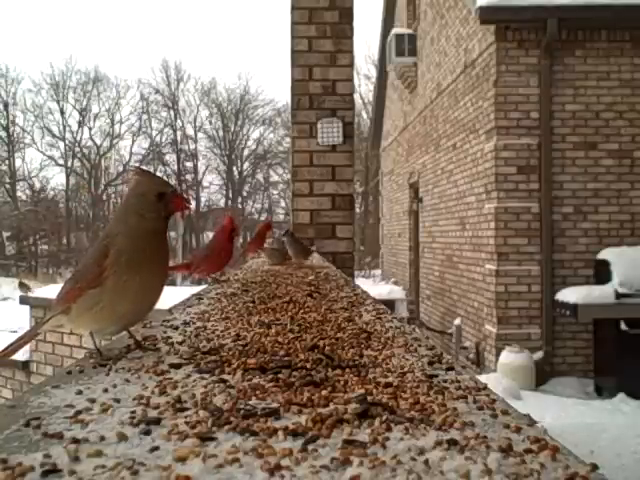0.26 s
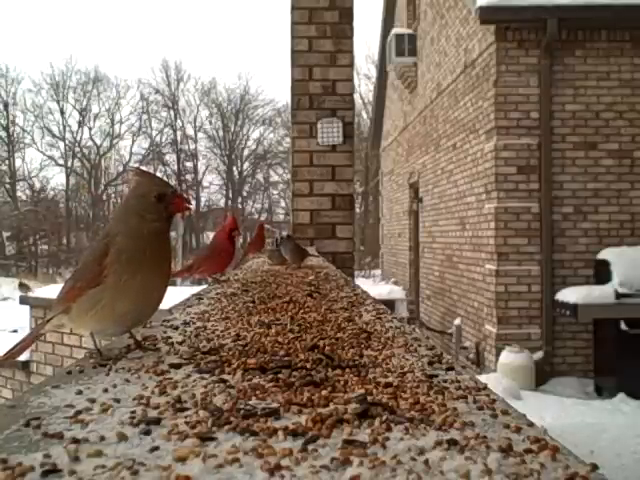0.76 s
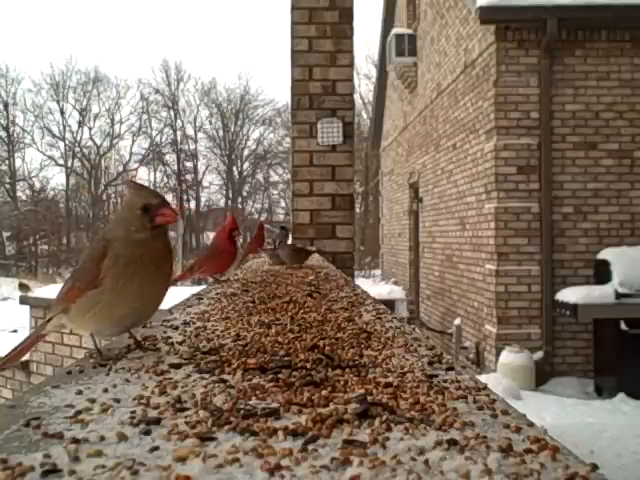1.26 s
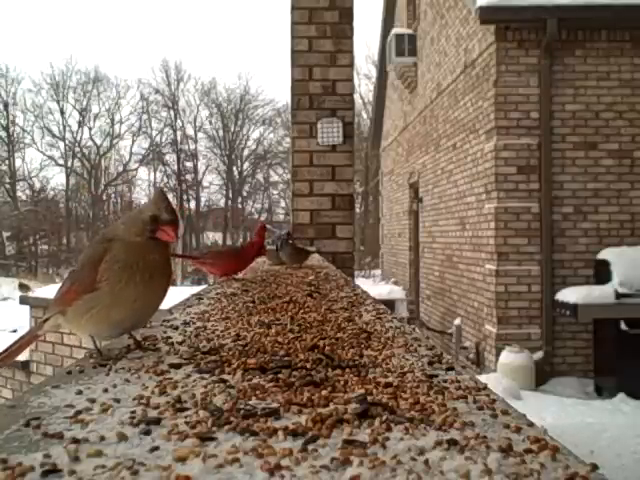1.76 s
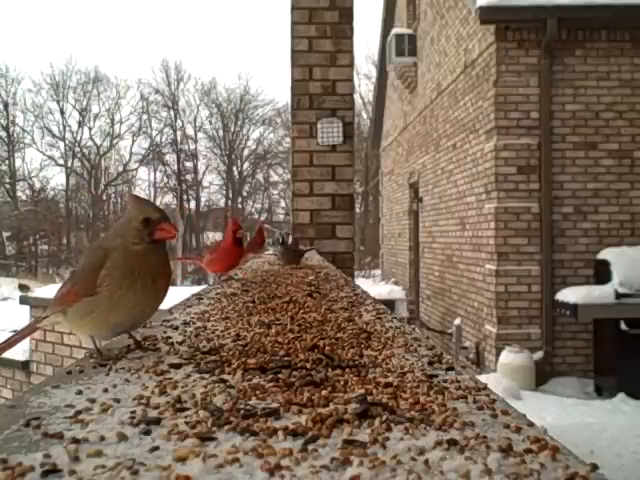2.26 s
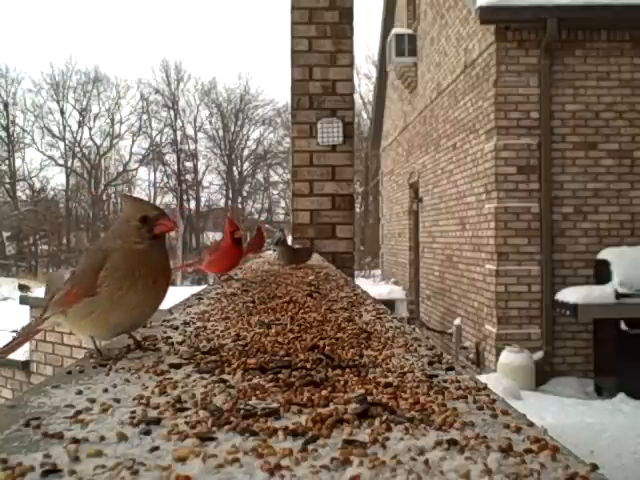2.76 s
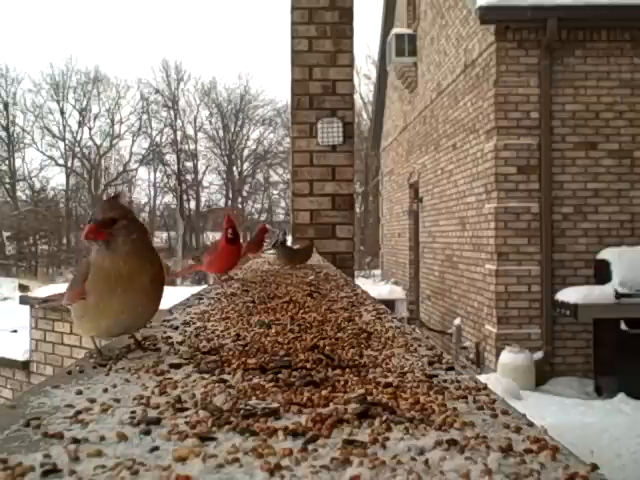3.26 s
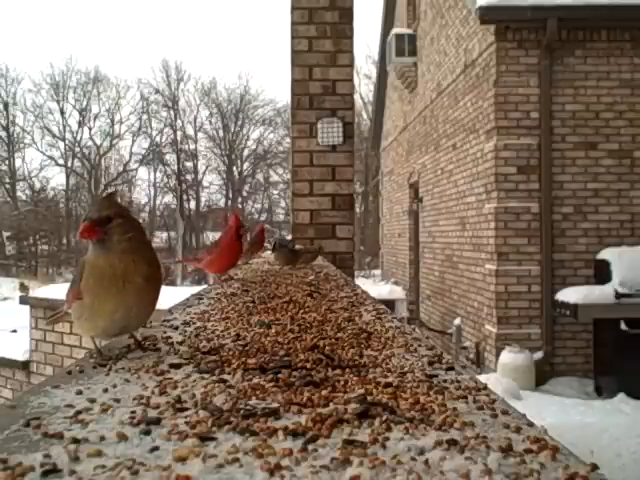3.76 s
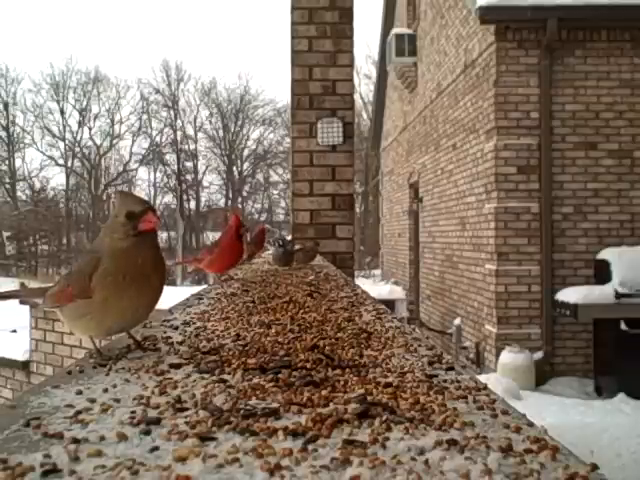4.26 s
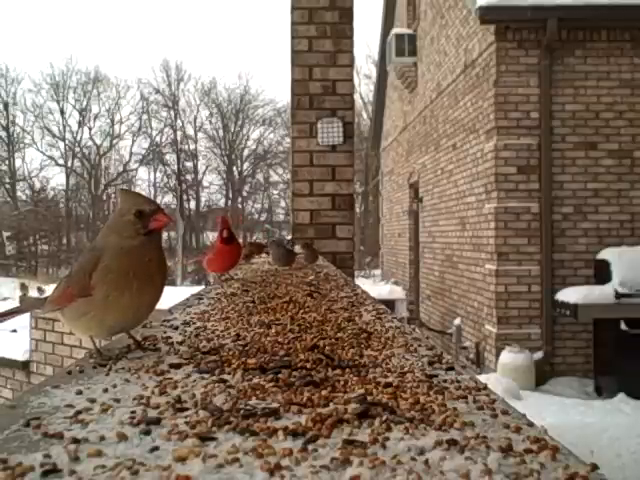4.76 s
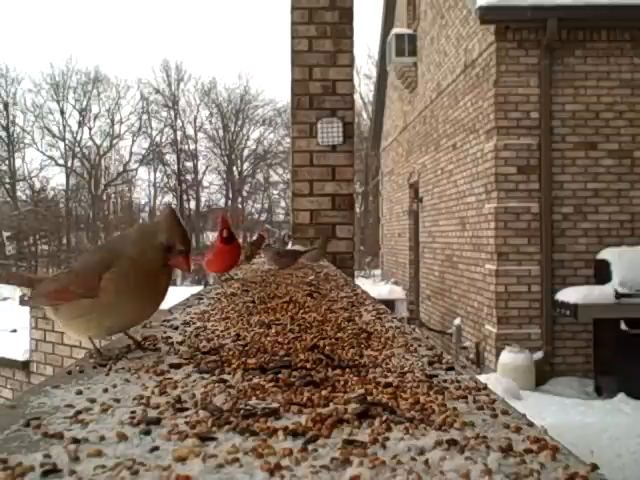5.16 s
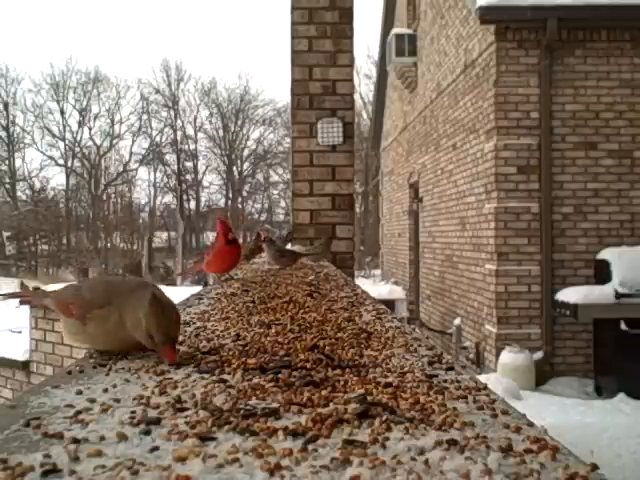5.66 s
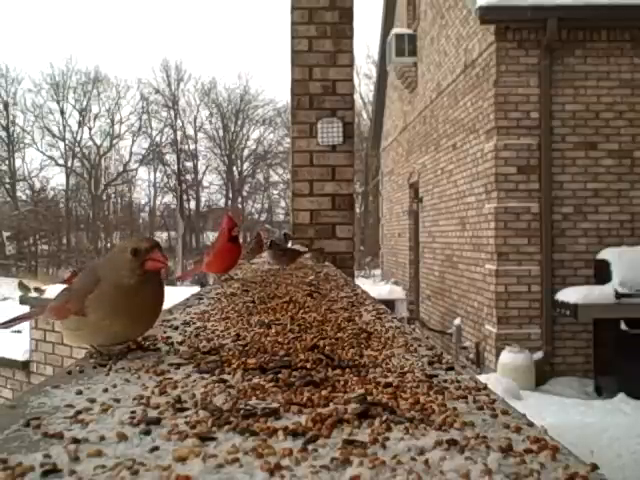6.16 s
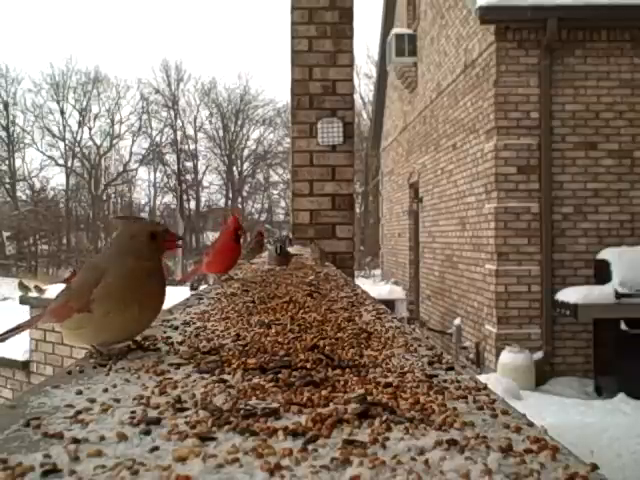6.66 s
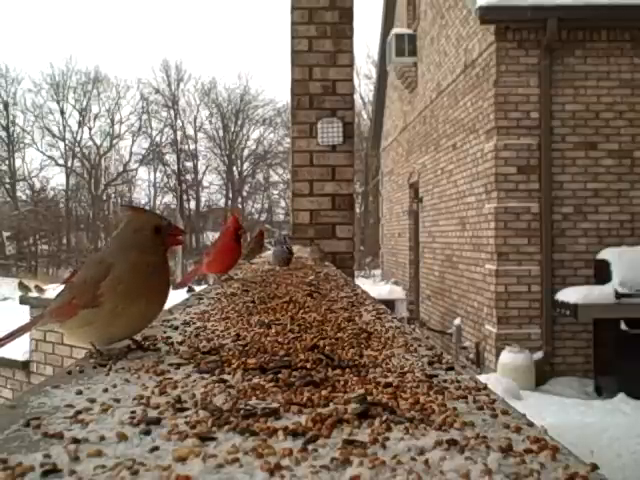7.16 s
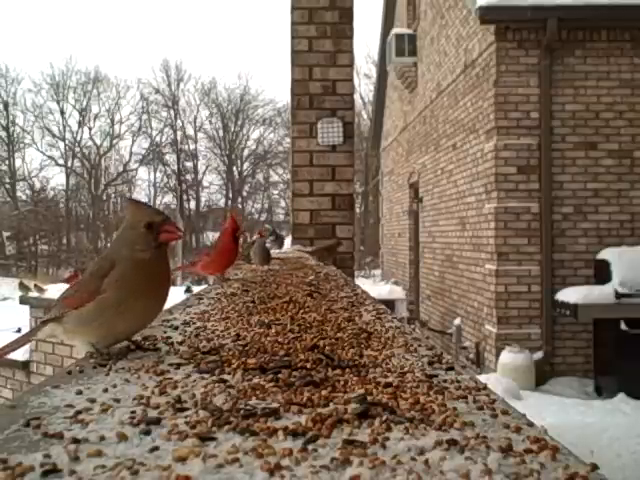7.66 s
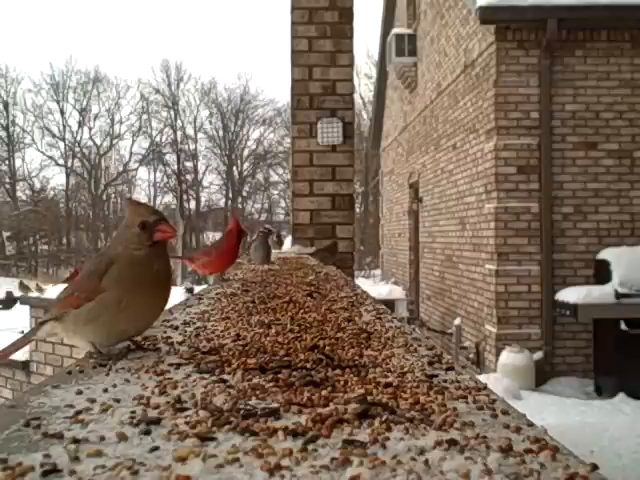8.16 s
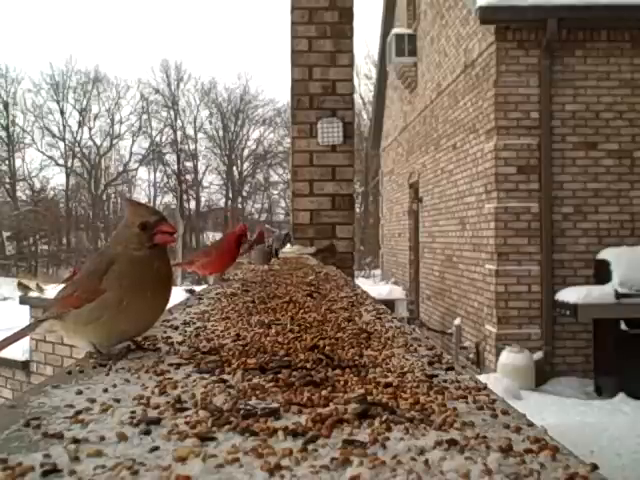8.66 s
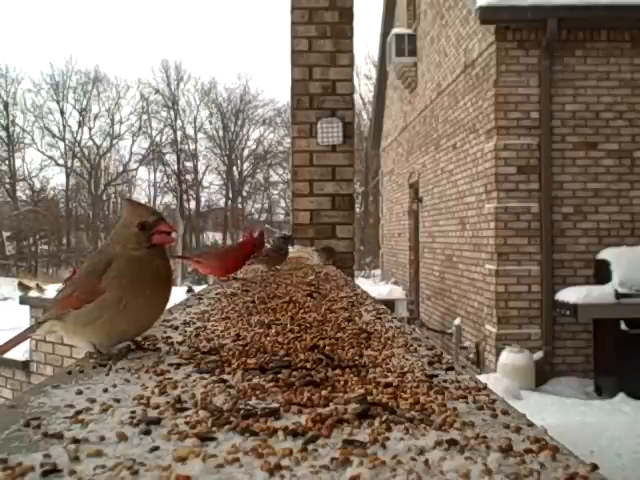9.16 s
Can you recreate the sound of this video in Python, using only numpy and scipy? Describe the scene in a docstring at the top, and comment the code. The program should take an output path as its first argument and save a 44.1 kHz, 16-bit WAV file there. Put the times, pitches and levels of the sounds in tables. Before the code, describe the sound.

An outdoor winter ledge beside a brick wall, heard close up in mono. Soft wind rumbles against the microphone, then thin distant whistles and chirps mix with sparse seed ticks. A bill knocks after six seconds, followed by the sharpest snaps. Wings hiss and a passing bird pushes a loud bass buffet; busy crisp cracking and one tiny peep follow, with a faint short echo.

```python
"""Songbirds cracking seeds in snow

Close by on a stone ledge, bills grip and crack seeds: damped shell and bill resonances, excited by impulses.
Scattered bits rustle as random contacts; a wall echo and a diffuse tail answer every sound of the ledge.
Wind and a bird flying past press turbulent eddies on the microphone; fluttering feathers hiss as dense grains.
Further off, other birds sing frequency-modulated near-sines over shaped noise of traffic, hiss and breeze."""
import sys
import numpy as np
from scipy import signal
from scipy.fft import rfft, irfft
from scipy.io import wavfile
from scipy.ndimage import uniform_filter1d

SR = 44100
rng = np.random.default_rng(int(sys.argv[2]) if len(sys.argv) > 2 else 0)


def dump(signal):
    """Clip the signal to [-1, 1] and save it as 16-bit WAV at the path in sys.argv[1]."""
    limited = np.clip(np.atleast_2d(signal).T, -1, 1)
    pcm = np.round(limited * 32767).astype(np.int16)
    wavfile.write(sys.argv[1], SR, pcm)


N = 414981
TIME = np.arange(N) / SR  # s


def undb(db):
    """Amplitude ratio: 20 dB is a factor of ten."""
    return 10 ** (np.asarray(db) / 20)


def unit(x):
    """Power normalization: scale to rms 1."""
    return x / np.sqrt(np.mean(x ** 2))


def unit_energy(x):
    """Energy normalization: scale the sum of squares to 1."""
    return x / np.sqrt(np.sum(x ** 2))


def add(out, s, x):
    """Superposition: mix x into out from time s on."""
    start = int(s * SR)
    x, start = x[max(-start, 0):], max(start, 0)
    out[start:start + len(x)] += x[:max(N - start, 0)]


def decay(t, t60):
    """Exponential decay: the level falls by 60 dB in t60 seconds."""
    return np.exp(-np.log(1000) * t / t60)


def spectrum_gain(points, size):
    """Spectral envelope: (Hz, dB) points joined over log frequency, as gain on the transform's bins."""
    hz, db = np.transpose(points)
    bins_hz = np.fft.rfftfreq(size, 1 / SR)
    return undb(np.interp(np.log(bins_hz + 1), np.log(hz), db))


def colour(x, points):
    """Linear filtering: weight x by a (Hz, dB) spectrum, then scale to rms 1."""
    return unit(irfft(rfft(x) * spectrum_gain(points, len(x)), len(x)))


def impulse(gain):
    """Minimum phase: folding the cepstrum gives the sharpest causal response with this gain."""
    cepstrum = irfft(np.log(gain))
    half = len(cepstrum) // 2
    cepstrum[1:half] *= 2
    cepstrum[half + 1:] = 0
    return irfft(np.exp(rfft(cepstrum)))


def walk(rate):
    """Low-pass random fluctuation: held random steps, smoothed twice, at rms 1."""
    hold = int(SR / rate)
    steps = np.repeat(rng.standard_normal(N // hold + 1), hold)[:N]
    return unit(uniform_filter1d(uniform_filter1d(steps, hold), hold))


def grains(size, rate, spread_db):
    """Shot noise: tiny contacts at random moments, a few much harder than the rest."""
    hardness = undb(spread_db * np.minimum(rng.exponential(size=size), 4))
    contact = rng.random(size) < rate / SR
    return contact * rng.standard_normal(size) * hardness


# Spectrum of the steady background. Each row: frequency in Hz, relative density in dB per Hz.
GARDEN = [(12, -7.5), (25, 2), (60, -8), (110, -10.5), (180, -8), (280, -10.5), (450, -15), (780, -18.5),
          (1150, -25.5), (1900, -29.5), (4000, -31.5), (8000, -33), (13000, -30.5), (16000, -31.5)]
GARDEN_DB = -56.5


def garden(sway_db=0.35, breeze_db=-71, gusty_db=1.5):
    """Stationary noise, slowly modulated: far traffic and microphone hiss, over a light uneven breeze."""
    bed = colour(rng.standard_normal(N), GARDEN) * undb(GARDEN_DB + sway_db * walk(2.24))
    breeze_spectrum = [(10, 1), (30, -12.0), (80, -12.0), (200, -30), (1000, -83)]
    breeze = colour(rng.standard_normal(N), breeze_spectrum)
    return bed + breeze * undb(breeze_db + gusty_db * walk(3.2))


def yard(x, wall_s=0.0085, wall_db=-27, tail_db=-25, t60=0.21, size=16384):
    """Reflection and reverberation: one echo off the brick wall, then a scattered tail, short over the snow."""
    t = np.arange(size) / SR
    late = np.maximum(t - wall_s, 0)
    scatter = unit_energy(rng.standard_normal(size) * (t > wall_s) * decay(late, t60))
    wall = unit_energy(rng.standard_normal(size) * (t > wall_s) * np.exp(-late / 0.00084))
    return signal.fftconvolve(x, undb(wall_db) * wall + undb(tail_db) * scatter)[:N]


def progress(length_s):
    """Normalized time: 0 to 1 over the length of a note."""
    return np.linspace(0, 1, int(length_s * SR))


def note(hz, rough, octave_db=-30, waver=0.0568, buzz_hz=900):
    """Frequency modulation: a near-sine follows a pitch curve, at rms 1; roughness makes the pitch buzz."""
    buzz = 1 + waver * rough * walk(buzz_hz)[:len(hz)]
    phase = 2 * np.pi * np.cumsum(hz * buzz) / SR
    swell = np.tanh(2 * np.sin(np.linspace(0, np.pi, len(hz))))
    return unit((np.sin(phase) + undb(octave_db) * np.sin(2 * phase)) * swell)


# Held whistles, most settling from above. Each row: start in seconds, length in seconds, settled pitch in Hz,
# starting excess as a share of the pitch, level in dB at mid-note.
WHISTLES = [(1.44, .3, 2887, .06, -76.5), (1.812, 0.23, 3920, 0.15, -67.5),
            (2.182, 0.23, 3980, 0.0205, -74.5), (4.206, 0.16, 4220, 0, -83)]
SETTLE_S, WHISTLE_FADE_DB_S = 0.062, 12
# Quick falling notes, mostly in pairs. Each row: start in seconds, length in seconds, level in dB.
SLURS = [(1.382, 0.053, -73), (1.441, .055, -67), (2.035, 0.032, -66.5), (2.067, 0.037, -68),
         (2.328, 0.021, -63), (2.357, 0.03, -67), (4.32, .034, -73)]
SLUR_FROM_HZ, SLUR_TO_HZ, SLUR_ROUGH = 4080, 3230, .45
# Rising or level chips and buzzes. Each row: start in seconds, length in seconds, middle pitch in Hz,
# rise in octaves, level in dB, roughness as a plain factor.
CHIRPS = [ (1.312, 0.014, 7200, .3, -65, .2), (1.458, .05, 6600, 0.21, -67, 1.1),
          (2.132, .04, 6440, .23, -66, 0.7), (2.470, 0.2, 4920, 0.09, -74, 1.04),
          (2.533, 0.019, 8170, 0.59, -55.5, .8), (3.443, .054, 6420, 0.42, -59.5, 0.24),
          (4.16, .024, 5680, 0.087, -73, .4), (4.49, .042, 4500, 0.024, -75, .3),
          (5.22, 0.0214, 6200, 0.25, -69, .7), (6, 0.087, 6800, .28, -70, 1.4),
          (6.455, .036, 5220, 0.03, -69, 0.46), (6.513, 0.034, 4450, 0, -68, 0.6)]
CHIRP_ARCH = 0.39  # the rise slows towards the end
# One short sinking peep.
PEEP_S, PEEP_LENGTH_S, PEEP_HZ, PEEP_SINK_HZ, PEEP_DB = 7.976, 0.023, 5500, 230, -58


def chirps(trees_db=-6, t60=0.23, size=16384):
    """Pitch glides and diffuse scattering: whistles, falling notes and chips, smeared by the trees."""
    out = np.zeros(N)
    for s, length, hz, excess, db in WHISTLES:
        t = length * progress(length)
        pitch = hz * (1 + excess * np.exp(-t / SETTLE_S))
        fade = undb(db - WHISTLE_FADE_DB_S * (t - length / 2))
        add(out, s, fade * note(pitch, rough=0.12))
    for s, length, db in SLURS:
        pitch = SLUR_FROM_HZ + (SLUR_TO_HZ - SLUR_FROM_HZ) * progress(length) ** 1.25
        add(out, s, undb(db) * note(pitch, SLUR_ROUGH))
    for s, length, hz, rise, db, rough in CHIRPS:
        u = progress(length) - .5
        pitch = hz * 2 ** (rise * (u - CHIRP_ARCH * u ** 2))
        add(out, s, undb(db) * note(pitch, rough))
    peep_pitch = PEEP_HZ - PEEP_SINK_HZ * progress(PEEP_LENGTH_S)
    # the octave is stronger than the fundamental
    add(out, PEEP_S, undb(PEEP_DB) * note(peep_pitch, rough=0.17, octave_db=3))
    trees = unit_energy(rng.standard_normal(size) * decay(np.arange(size) / SR, t60))
    return out + undb(trees_db) * signal.fftconvolve(out, trees)[:N]


def buffets(eddies, slope=3.86, tilt=0.63, largest=0.12, size=16384):
    """Turbulent pressure: each eddy (s, half length s, dB, corner Hz) is a swell of random-phase swirls."""
    out, hz = np.zeros(N), np.fft.rfftfreq(size, 1 / SR)
    t = (np.arange(size) - size // 2) / SR
    for s, half_s, db, corner_hz in eddies:
        pace = hz / corner_hz  # faster air moves the band of swirls up
        large_swirls = pace ** (2 - tilt) / (pace ** 2 + largest ** 2)  # big slow swirls carry the most
        gain = large_swirls / np.sqrt(1 + pace ** (2 * slope))
        swirl = irfft(gain * np.exp(2j * np.pi * rng.random(len(hz))))
        eddy = unit_energy(swirl * np.exp(-.5 * (t / (0.94 * half_s)) ** 2))
        # the level is the rms over two half lengths
        add(out, s + t[0], eddy * undb(db) * np.sqrt(2 * half_s * SR))
    return out


def eddy_train(curve, count, fill):
    """Sampling a flow curve: successive eddies as rows (s, half length s, the curve's values)."""
    s, *columns = np.transpose(curve)
    times, step = np.linspace(s[0], s[-1], count, retstep=True)
    return [(at, step * fill, *(np.interp(at, s, column) for column in columns)) for at in times]


# The opening gust at the microphone. Each row: time in seconds, level in dB.
GUST = [(0.0, -39), (0.016, -29), (0.202, -44.5), (0.242, -35.5), (0.33, -40), (0.348, -47), (0.478, -24),
        (0.518, -38), (0.54, -32.5), (0.612, -48), (0.632, -41), (0.75, -54)]
# Lone puffs of wind. Each row: middle in seconds, half length in seconds, level in dB.
PUFFS = [(0.936, 0.011, -35.5), (0.972, 0.015, -42), (1.035, 0.01, -39), (1.582, 0.18, -53),
         (2.942, 0.023, -52), (4.467, 0.052, -51.5), (5.415, 0.06, -55), (6.853, 0.027, -43)]
# Stronger wind swirls faster: corner at the reference level, dB for each doubling of the corner.
WIND_HZ, WIND_REF_DB, WIND_DOUBLING_DB = 130, -35.5, 20


def wind(gain_db=0):
    """Flow speed scaling: a gust and lone puffs hit the microphone, brighter the stronger they are."""
    eddies = []
    for s, half_s, db in eddy_train(GUST, count=33, fill=0.41) + PUFFS:
        corner_hz = WIND_HZ * 2 ** ((db - WIND_REF_DB) / WIND_DOUBLING_DB)
        eddies.append((s, half_s, db + gain_db, corner_hz))
    return buffets(eddies)


# Draught of the bird passing the microphone. Each row: time in seconds, level in dB, corner in Hz.
DRAUGHT = [(7.44, -21.5, 45), (7.455, -14, 48), (7.475, -28.5, 210), (7.503, -23.5, 75), (7.527, -9.5, 105),
           (7.542, -13.5, 342), (7.565, -12.5, 294), (7.6, -18.5, 300), (7.625, -19.5, 272),
           (7.655, -31, 135), (7.68, -23, 221), (7.71, -41.5, 120), (7.755, -42, 100)]
# Its closest wing strokes. Each row: middle in seconds, half length in seconds, level in dB.
STROKES = [(7.54, 0.0086, -30), (7.564, 0.0028, -24.5), (7.6, .0049, -23)]
STROKE_HZ = 760  # corner


def fly_past():
    """Displaced air and wake: a slow push ahead of the bird, slaps of its wings, then a dying wake."""
    slaps = [(s, half_s, db, STROKE_HZ) for s, half_s, db in STROKES]
    return buffets(eddy_train(DRAUGHT, count=16, fill=.42)) + buffets(slaps, largest=.45)


# Spectrum of scraping feathers. Each row: frequency in Hz, relative density in dB per Hz.
WING = [(300, 11.5), (1500, -1.5), (4000, -6.5), (7500, -4), (11000, -2.5), (14000, 3), (16000, -7.5)]
# Bouts of fluttering. Each row: peak time in seconds, hold in seconds, peak level in dB before the wing beat.
FLUTTERS = [(6.832, 0.074, -52), (7.427, 0.21, -42)]
FLUTTER_RISE_DB_S, FLUTTER_SAG_DB_S, FLUTTER_FALL_DB_S = 328, 44.5, 300  # the fall adds to the sag


def wings(beat_hz=21, depth_db=3, rate=5000):
    """Amplitude-modulated friction noise: each flutter rises, sags and stops, swelling with each wing beat."""
    effort = np.zeros(N)
    for s, hold_s, db in FLUTTERS:
        t = TIME - s
        rise_and_sag = np.minimum(FLUTTER_RISE_DB_S * t, -FLUTTER_SAG_DB_S * t)
        fall = FLUTTER_FALL_DB_S * np.maximum(t - hold_s, 0)
        effort += undb(db + rise_and_sag - fall)
    barbs = colour(grains(N, rate, spread_db=2.2), WING)
    beat = undb(depth_db * np.sin(2 * np.pi * beat_hz * TIME))
    return effort * beat * barbs


# Spectrum of seeds and husks touching. Each row: frequency in Hz, relative density in dB per Hz.
SEED = [(300, -33), (1200, -16), (3200, -11), (5500, -11), (7000, -11), (9000, -2.5), (13000, 2.5),
        (16000, -13)]


def nibbling(rate=25, spread_db=1, level_db=-76):
    """Sparse shot noise: faint ticks of husks rolled in the bills further along the ledge."""
    return undb(level_db) * colour(grains(N, rate, spread_db), SEED)


# Loose seed shifting under a bill or a foot. Each row: start in seconds, level in dB before gain and settling.
RUSTLES = [(0.203, -62), (0.244, -60), (1.947, -51), (2.288, -52), (2.314, -51.5), (2.778, -49),
           (2.785, -34), (3.711, -51), (6.302, -47), (6.373, -38), (6.947, -54.5), (7.037, -53.5),
           (7.616, -55), (7.744, -52), (7.839, -53), (7.861, -55), (8.502, -57), (8.617, -43.5)]
# Bits of shell scatter after a crack: level after a 0 dB ring (before the gain), dB per dB of ring.
SCATTER_DB, SCATTER_SLOPE = -48, 0.51
# Harder cracks throw the bits further: time in the air after a 0 dB ring, dB for each doubling.
FLIGHT_S, FLIGHT_DOUBLING_DB = 0.0064, 12


def loose_seed(t60=0.13, rise_s=0.0006, rate=12000, gain_db=1.5, size=8192):
    """Dense granular collisions: seeds stirred by a bird or by flying bits jostle each other, then settle."""
    out, t = np.zeros(N), np.arange(size) / SR
    settle = (1 - np.exp(-t / rise_s)) * decay(t, t60)
    scatters = []
    for s, ring_db, _, _ in CRACKS:
        landing_s = s + FLIGHT_S * 2 ** (ring_db / FLIGHT_DOUBLING_DB)
        scatters.append((landing_s, SCATTER_DB + SCATTER_SLOPE * ring_db))
    for s, db in RUSTLES + scatters:
        contacts = colour(grains(size, rate, spread_db=1), SEED)
        add(out, s, undb(db + gain_db) * settle * contacts)
    return out


# A bill knocking on a hard seed or the stone. Each row: start in seconds, energy in dB,
# brightness in dB per octave.
TAPS = [(1.774, -41, -9), (1.942, -26.5, -5), (5.8116, -19.5, -6.5), (6.1293, -18.5, 2), (6.1302, -8, 2),
        (6.273, -36, -7), (6.299, -29, -6), (6.5637, -28, 3)]
# Modes of the bill. Each row: frequency in Hz before detuning, relative level in dB before the brightness,
# t60 in seconds.
BILL = [(780, -15.5, 0.012), (1560, -19, 0.008), (2470, -15, .005), (3130, 1, 0.0065), (4580, 10, 0.0041),
        (6960, 9, 0.0052), (9900, 1, 0.0061), (12600, 10, 0.0026)]


def tapping(detune=.02, size=512):
    """Modal synthesis: damped modes of the bill, detuned as every tap meets it at another spot."""
    out, t = np.zeros(N), np.arange(size) / SR
    hz, db, t60 = np.transpose(BILL)[:, :, None]
    for s, energy_db, bright_db in TAPS:
        phase = 2 * np.pi * hz * (1 + detune * rng.standard_normal(hz.shape)) * t
        modes = undb(db + bright_db * np.log2(hz)) * np.cos(phase) * decay(t, t60)
        add(out, s, undb(energy_db) * unit_energy(modes.sum(0)))
    return out


# Spectrum of the knock on the bill. Each row: frequency in Hz, relative density in dB per Hz.
KNOCK = [(200, -2), (600, 0), (1700, -3), (2600, -2.5), (4200, -1), (5500, -4.5), (7000, -3), (10000, -4),
         (16000, 3)]


def crack(ring_db, ring_hz, knock_db, width_hz=4700, skirt=1.13, deep_hz=360, hard_db=-9,
          splinter=0.11, splinter_s=0.00086, size=512):
    """Impulse excitation: a fracture and its splinters ring the shell for a few cycles and knock on the bill."""
    t, hz = np.arange(size) / SR, np.fft.rfftfreq(size, 1 / SR)
    shell = impulse(1 / (1 + (2 * (hz - ring_hz) / width_hz) ** 2) ** skirt)
    # only a hard crack moves the whole bill
    lowest_hz = np.clip(deep_hz * undb(hard_db - knock_db), deep_hz, 1800)
    bill = impulse(spectrum_gain(KNOCK, size) / np.sqrt(1 + (lowest_hz / (hz + 20)) ** 4))
    force = splinter * rng.standard_normal(size) * np.exp(-t / splinter_s)
    force[0] = 1  # the fracture itself
    ring = undb(ring_db) * unit_energy(np.convolve(force, shell))
    knock = undb(knock_db) * unit_energy(np.convolve(force, bill))
    return ring + knock


# Shells cracking in a bill. Each row: start in seconds, shell ring energy in dB, shell ring frequency in Hz,
# knock energy in dB.
CRACKS = [ (0.3043, -22, 10100, -41), (1.9469, -20.5, 12000, -22), (1.9925, -29, 11500, -47),
          (2.1942, -36, 13300, -31), (2.287, -28, 12900, -25.5), (2.315, -22.5, 11000, -25.5),
          (2.735, -26, 12400, -45), (2.7869, -28, 11500, -15.5), (2.7933, -13.5, 9900, -38),
          (2.8495, -22, 13200, -28.5), (3.704, -23, 14100, -26), (3.7124, -11, 12500, -22),
          (4.061, -25.5, 14500, -33), (5.062, -31, 13400, -45), (5.2907, -32, 15300, -35),
          (6.092, -26, 14500, -32), (6.303, -26, 11900, -22), (6.365, 8.5, 14100, -5),
          (6.6693, -11, 10900, -14), (6.6701, 3.5, 15200, -5), (6.817, -23.5, 12600, -40),
          (6.893, -30, 12300, -26), (7.041, -24.5, 13060, -41), (7.0915, -28, 10200, -30),
          (7.2587, -29, 13200, -29), (7.42, .5, 12800, -13), (7.7974, -28.5, 12800, -33),
          (7.8662, -17, 11900, -35), (8.054, -18.5, 12700, -29), (8.1539, -11, 12000, -33),
          (8.2201, -26, 11300, -51), (8.2606, -2.5, 12200, -6.5), (8.2713, -12, 11100, -39),
          (8.5538, -16, 12700, -27), (8.563, -19, 12500, -17), (8.6108, -4.5, 11200, -17.5),
          (8.6157, -9, 12100, -2.5), (8.928, -18.5, 12100, -22.5), (8.9494, -10, 12250, -22),
          (9.1678, -26, 12100, -25.5)]
# The bill grips each seed just before it cracks: ring and knock energy, longest lead.
GRIP_RING_DB, GRIP_KNOCK_DB, GRIP_LEAD_S = -34, -41, .022


def cracking():
    """Paired impulses: the nearest birds grip each seed lightly, then crack it."""
    out = np.zeros(N)
    for s, ring_db, ring_hz, knock_db in CRACKS:
        lead_s = GRIP_LEAD_S * rng.uniform(.2, 1)
        add(out, s - lead_s, crack(GRIP_RING_DB, ring_hz, GRIP_KNOCK_DB))
        add(out, s, crack(ring_db, ring_hz, knock_db))
    return out


def scene():
    """Superposition: the ledge, its reflections, the moving air and the garden, in one channel."""
    ledge = wings() + nibbling() + loose_seed() + tapping() + cracking()
    surroundings = garden() + yard(ledge) + chirps()
    return (surroundings + wind() + fly_past() + ledge)[None]


def record(dry, top_hz=16100):
    """Band limiting: a steep elliptic low-pass cuts the top of the treble."""
    return signal.sosfilt(signal.ellip(10, .2, 80, top_hz, fs=SR, output="sos"), dry)


dry = scene()
out = record(dry)
dump(out)
```